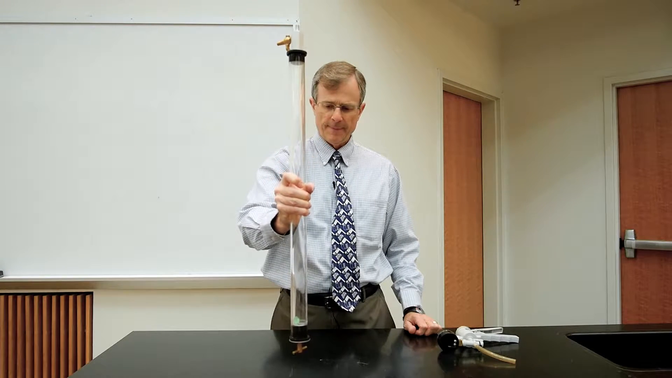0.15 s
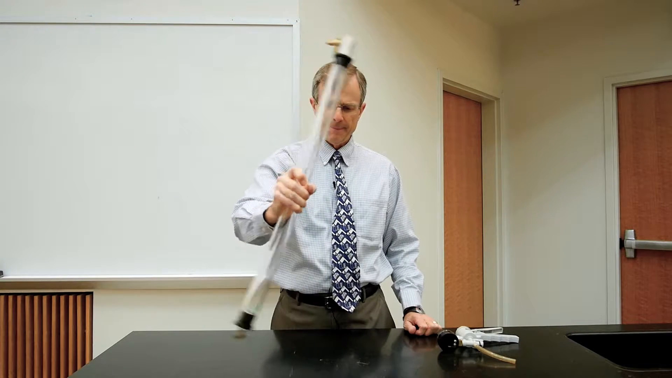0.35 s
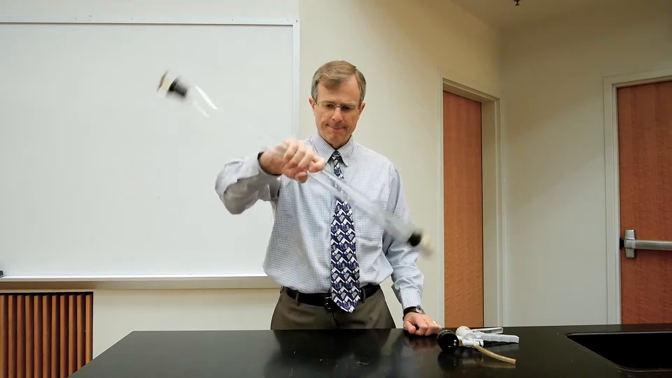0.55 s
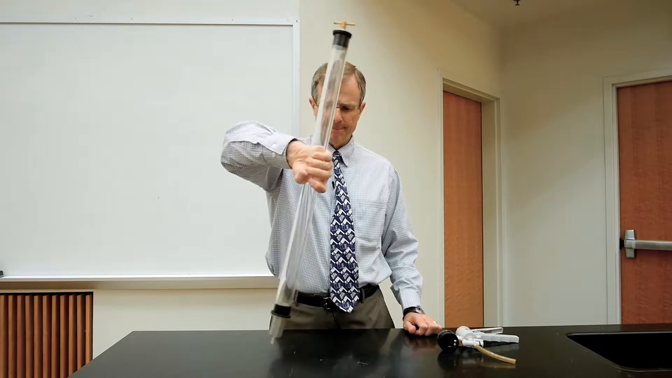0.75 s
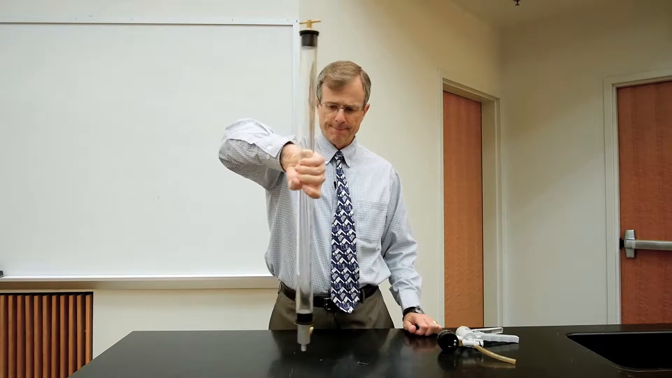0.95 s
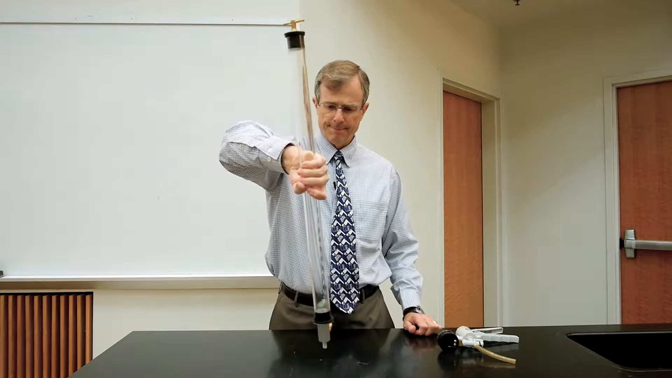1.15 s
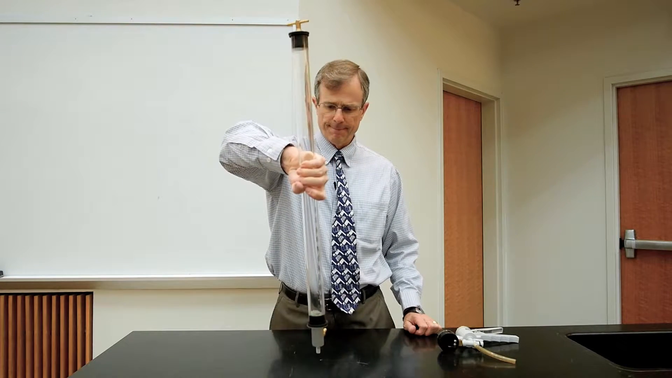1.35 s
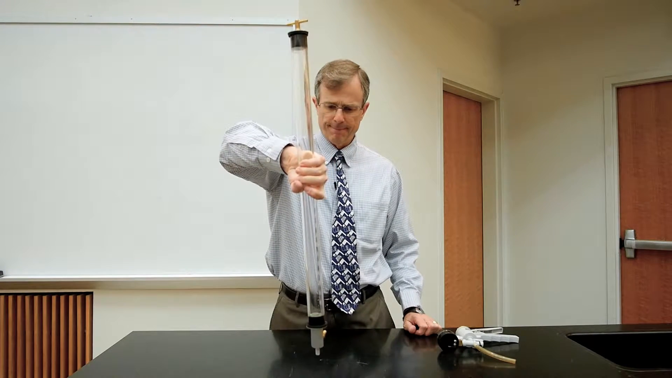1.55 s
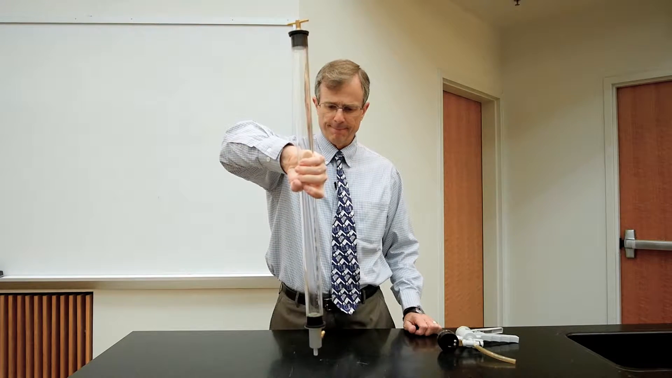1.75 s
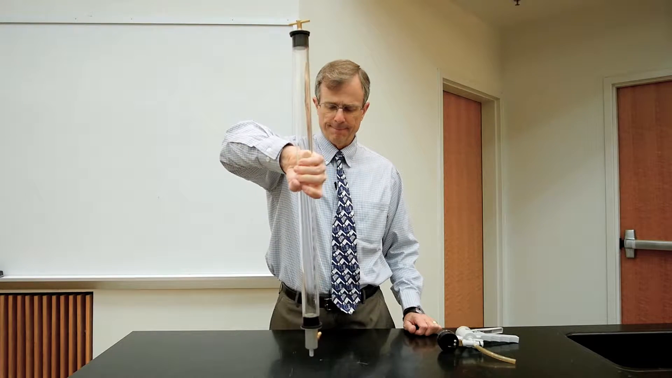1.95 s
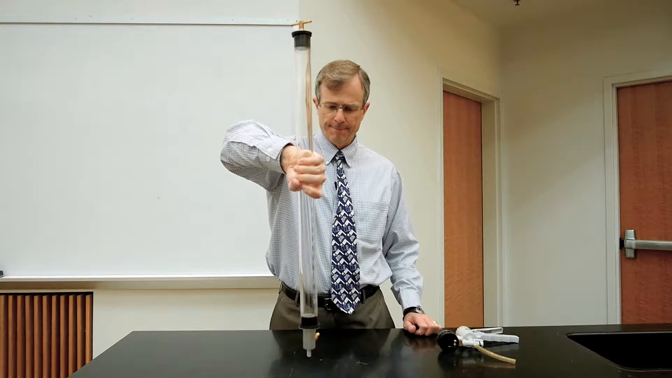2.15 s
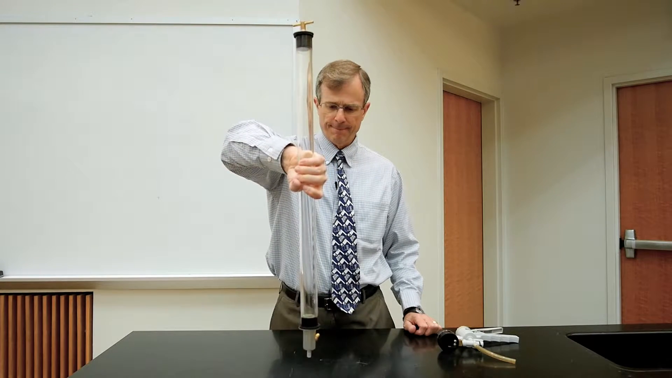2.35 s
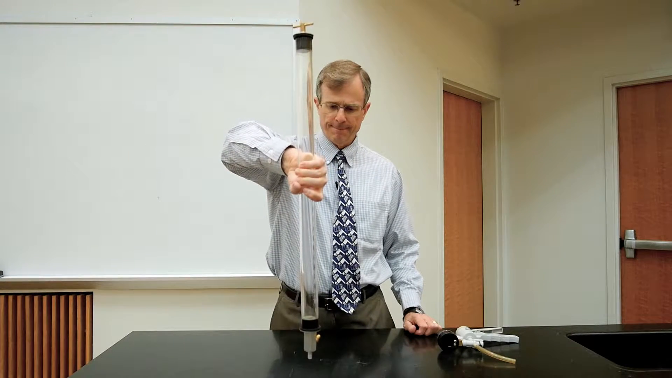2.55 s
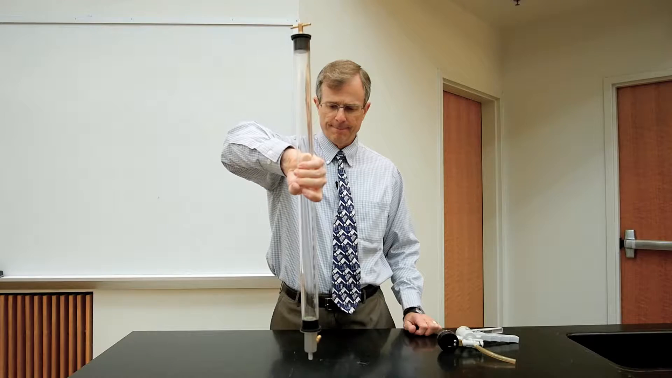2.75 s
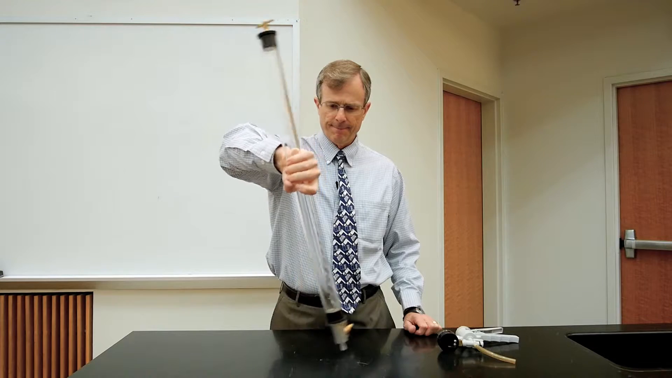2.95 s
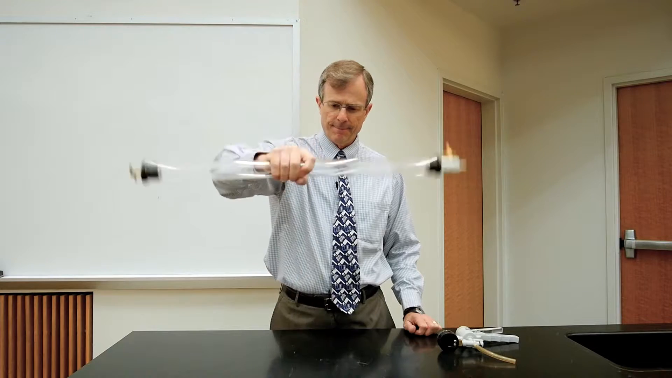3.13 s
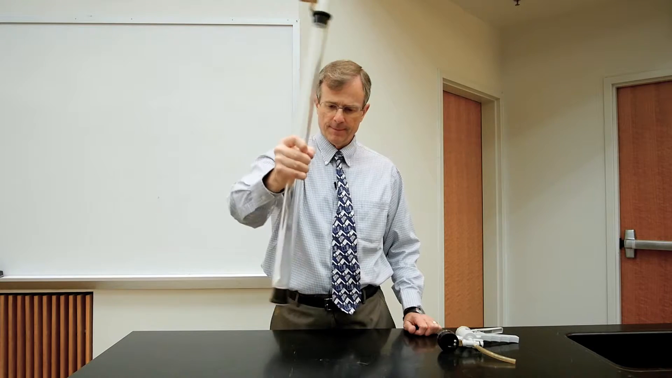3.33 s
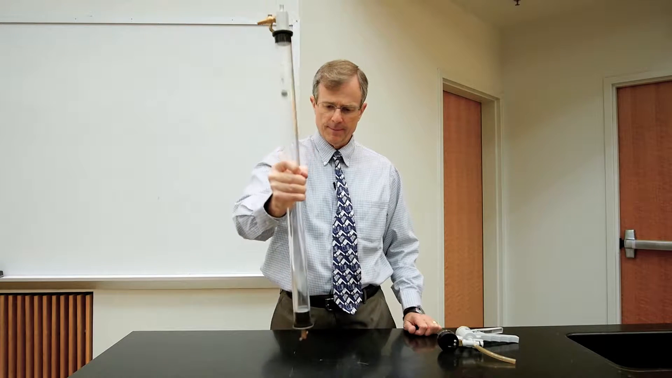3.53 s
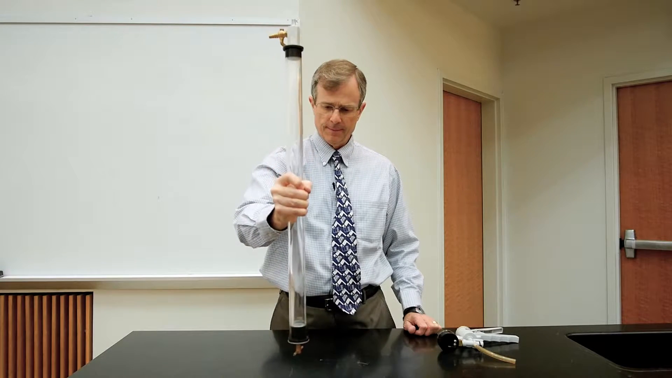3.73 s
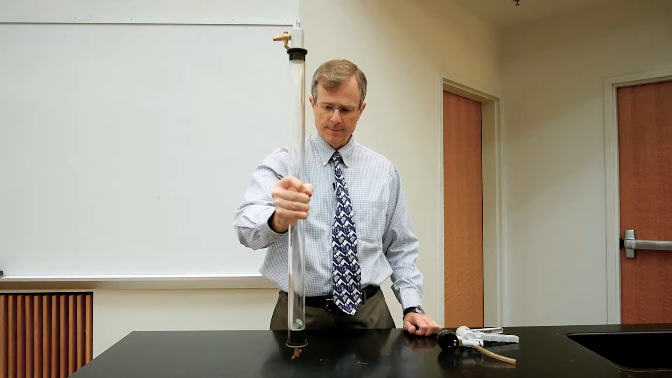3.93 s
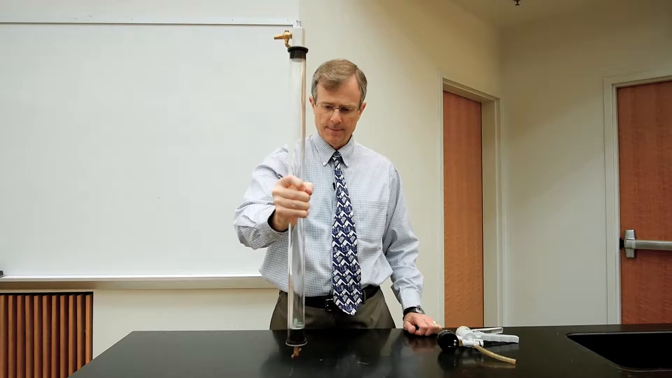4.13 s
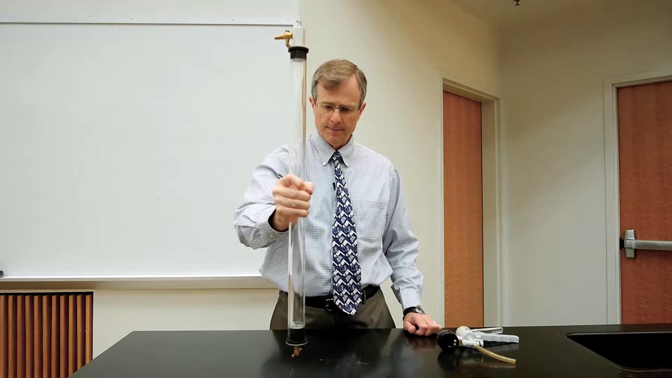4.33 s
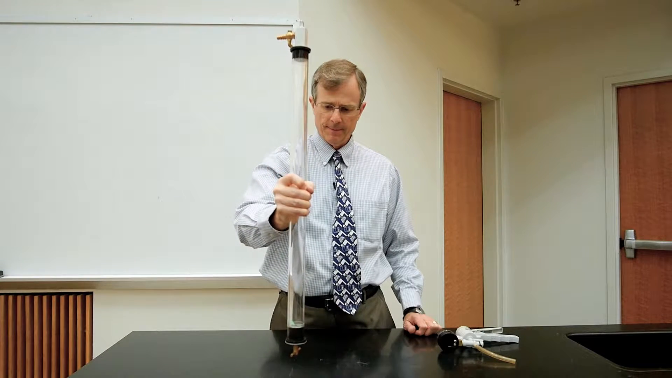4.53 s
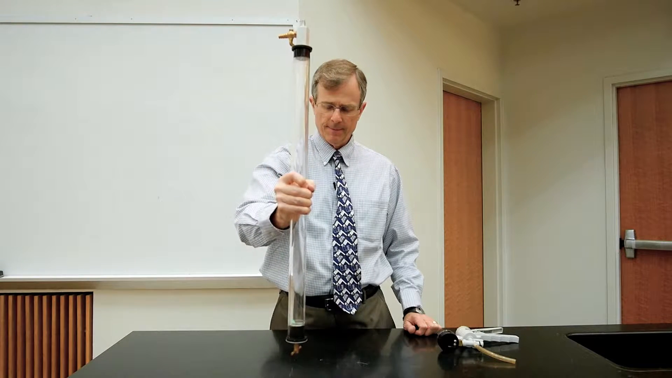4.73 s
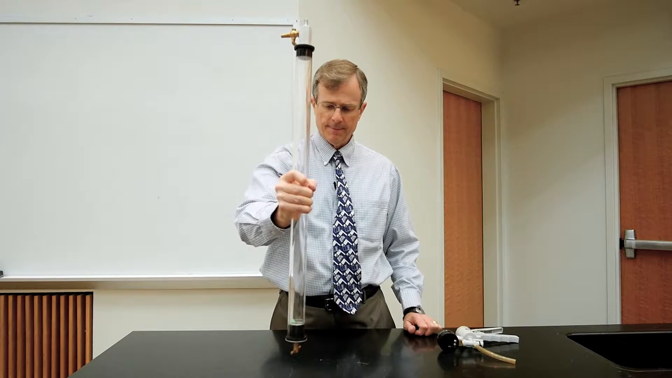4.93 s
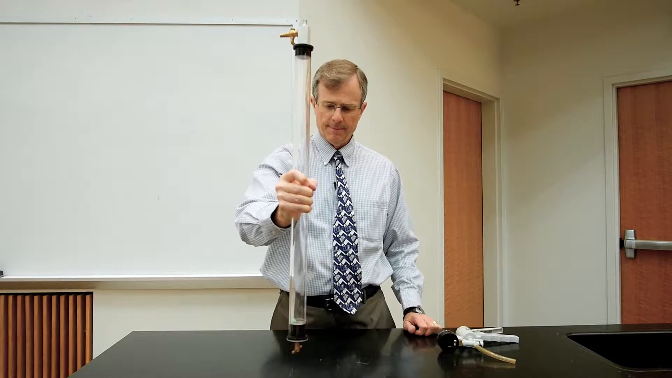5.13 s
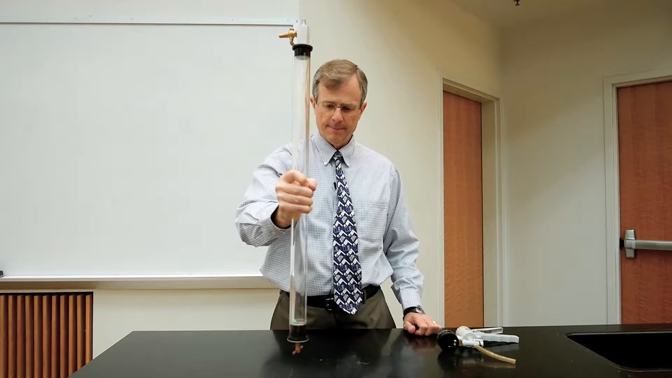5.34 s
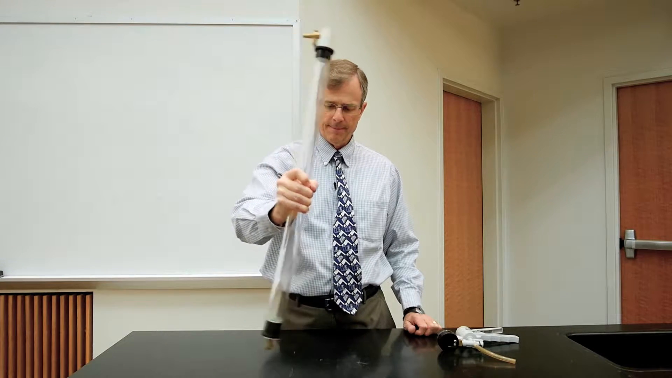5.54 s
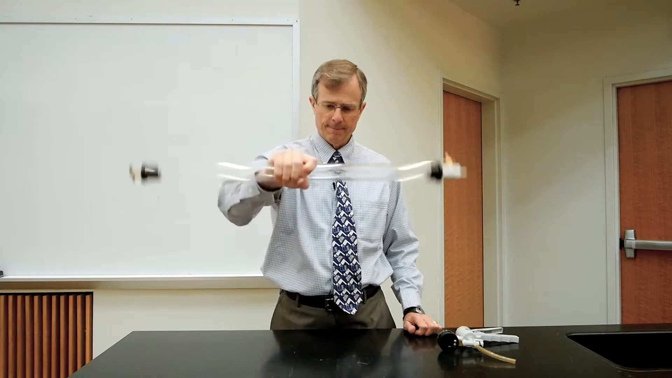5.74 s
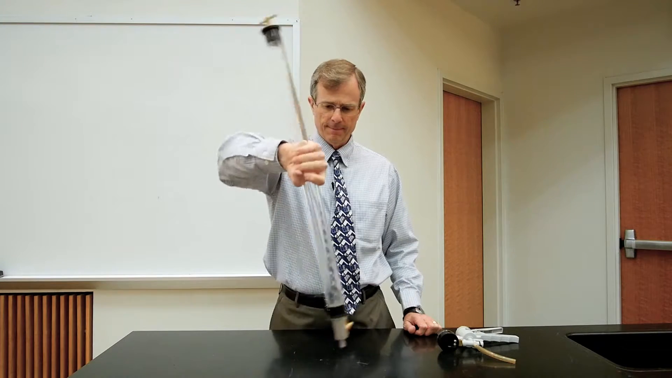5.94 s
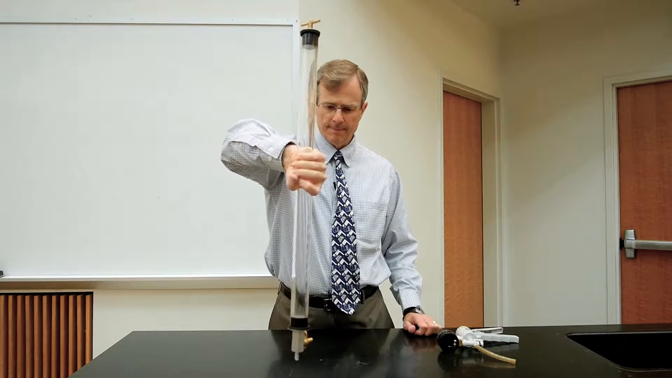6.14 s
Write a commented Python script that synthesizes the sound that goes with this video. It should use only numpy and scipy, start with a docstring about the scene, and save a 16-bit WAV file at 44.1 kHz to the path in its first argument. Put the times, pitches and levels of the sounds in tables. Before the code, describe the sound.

A quiet classroom has a low, slightly wavering ventilation rumble and faint hiss throughout. Near 0.3 s two tiny glassy clicks sound. A barely audible swish at 0.6 s accompanies the turning tube, and from 0.74 s a coin knocks quickly against glass and stopper, bright, dry and hard, with another cluster around 1.0 s. The strongest landing comes at 1.15 s with a short low thump, followed by gritty skidding and tiny ticks until 1.5 s. Quiet follows, broken by a light tap at 2.99 s. The next turn swishes softly near 3.3 s, with fine sliding ticks from 3.35 to 3.65 s. A sharp clack at 3.8 s leads into rapid bounces, a brief skid and delicate metallic settling until about 4.3 s. After more quiet, a third faint swish at 5.85 s precedes separate crisp taps from 5.99 to 6.28 s. Short reflections and a faint room tail follow the impacts.

```python
"""Coin in a turning glass tube

A coin skips and rattles down a long glass tube that is turned over by hand in a quiet classroom.
Each tap is a burst of tiny contacts that rings stopper, tube wall, glass and coin; heavy blows add a low push.
Skids are grainy noise. Bench and walls answer with smeared echoes and a faint tail.
Filtered noise makes the ventilation rumble, the microphone hiss and the faint swish of the swinging arm."""
import sys
import numpy as np
from scipy import signal
from scipy.fft import rfft, irfft, next_fast_len
from scipy.io import wavfile
from scipy.ndimage import uniform_filter1d

SR = 44100
rng = np.random.default_rng(int(sys.argv[2]) if len(sys.argv) > 2 else 0)


def pcm_store(signal):
    """Save signal as 16-bit PCM."""
    levels = np.round(np.clip(np.atleast_2d(signal), -1, 1) * 32767)
    wavfile.write(sys.argv[1], SR, levels.astype(np.int16).T)


N = 277036  # length in samples


def undb(db):
    """Turns a level in dB into a gain."""
    return 10 ** (np.asarray(db) / 20)


def unit(x):
    """Scales a sound so that its squared samples sum to 1."""
    return x / np.sqrt(np.sum(x ** 2))


def decay(t, t60):
    """Fading of a ring that loses 60 dB in t60 seconds."""
    return np.exp(-np.log(1000) * t / t60)


def band(x, hz, width_hz):
    """Keeps a broad band around hz, its edges held between hz / 4 and 0.45 of the sample rate."""
    low_hz = max(hz - width_hz / 2, hz / 4)
    high_hz = min(hz + width_hz / 2, .45 * SR)
    return signal.sosfilt(signal.butter(2, [low_hz, high_hz], "band", fs=SR, output="sos"), x)


def walk(rate):
    """Slow random wavering: levels held 1 / rate s, then smoothed twice; its spread is near 1."""
    hold = int(SR / rate)
    steps = np.repeat(rng.standard_normal(N // hold + 1), hold)
    smooth = uniform_filter1d(uniform_filter1d(steps, hold), hold)
    return 1.3 * smooth[:N]


def ring(modes, size, spread_db=0.):
    """A struck body rings as a sum of fading sines, with pitch and level a little different each time."""
    hz, db, t60 = np.transpose(modes)[:, :, None]
    t = np.arange(size) / SR
    chance = rng.standard_normal((len(modes), 2))
    gain = undb(db + spread_db * chance[:, :1]) * decay(t, t60)
    struck_hz = hz * (1 + .01 * chance[:, 1:])
    return np.sum(gain * np.sin(2 * np.pi * struck_hz * t), axis=0)


def add(track, sound, s):
    """Mixes a sound into the track at time s."""
    start = int(s * SR)
    track[start:start + len(sound)] += sound[:len(track) - start]


def air():
    """Ventilation and microphone hiss are noise shaped over frequency; the low part wavers a little."""
    # colour of the steady noise: f/Hz, relative level/dB per Hz
    colour_points = [(12, -59), (20, -31), (31, -16.5), (53, -9.5), (72, -2.5), (106, -3), (149, -1),
                     (353, -7.5), (728, -12), (910, -19), (1590, -27.5), (1830, -29.5), (2100, -30.5),
                     (3770, -39.5), (15600, -44)]
    level_db, hiss_top_hz, split_hz, waver_db = -43, 15850, 900, 1.44
    size = next_fast_len(N)
    hz = np.maximum(np.arange(size // 2 + 1) * SR / size, 1)
    points_hz, points_db = np.transpose(colour_points)
    colour = undb(np.interp(np.log(hz), np.log(points_hz), points_db))
    colour /= 1 + (hz / hiss_top_hz) ** 200  # steep end of the hiss
    noise = rfft(rng.standard_normal(size)) * colour
    low = 1 / (1 + (hz / split_hz) ** 2)
    rumble = irfft(noise * low, size)[:N]
    hiss = irfft(noise * (1 - low), size)[:N]
    return unit(rumble * undb(waver_db * walk(3.59)) + hiss) * np.sqrt(N) * undb(level_db)


def swing():
    """Arm and tube stir the air: a soft broad swish that swells while the tube is turned over."""
    # swings: time of fastest motion t/s, level/dB before the waver
    swings = [(.6, -60), (3.3, -62), (5.85, -62)]
    spread_s, tilt_hz, waver_db = 0.17, 2500, 1.3
    t = np.arange(N) / SR
    noise = band(rng.standard_normal(N), 2400, 16000)  # the edge limits make this 600 to 10400 Hz
    # a gentle fall above tilt_hz
    noise = signal.sosfilt(signal.butter(1, tilt_hz, fs=SR, output="sos"), noise)
    # each swell is bell-shaped
    swell = sum(undb(db) * np.exp(-.5 * ((t - s) / spread_s) ** 2) for s, db in swings)
    return unit(noise) * np.sqrt(N) * swell * undb(waver_db * walk(25))


def blows():
    """Lists each contact: time in s, chatter in ms, energy in dB of stopper, wall, glass, coin, coin edge."""
    # Energies here are given as rms over 1 ms.
    # taps of the coin: t/s, chatter/ms, then wall ring, glass, coin and coin edge energy/dB
    tap_rows = [(0.3252, 0.46, -28, -23.5, -35, -39), (0.3342, 0.37, -35.5, -38, -52, -63),
                (0.74, 1.3, -18, -16, -20.5, -28), (0.7581, 0.53, -62, -19, -18, -27),
                (0.7745, 0.19, -34, -22.5, -28, -43), (0.7974, 0.27, -43, -32, -34, -46),
                (0.8055, 0.42, -20, -24.5, -23, -21.5), (0.8102, 2.3, -24, -13.5, -13.5, -29),
                (0.8152, 0.9, -46, -25, -26, -38), (0.9816, 1.1, -25, -24, -16, -35),
                (1.0028, 0.75, -25.5, -25.5, -49, -49), (1.015, 2.6, -33, -39, -41, -62),
                (1.0212, 3.1, -32, -23, -40, -49), (1.0344, 1.7, -21.5, -17.5, -18, -26.5),
                (1.0486, 3.3, -33, -29, -36, -38), (1.1493, 1.08, -19.5, -20.5, -11.5, -16),
                (1.134, 3, -65, -52, -46, -48), (1.1583, 0.41, -55, -57, -39, -27),
                (1.166, 2, -56, -46, -40, -36), (1.1725, 0.7, -51, -55, -43, -34),
                (1.248, 1.7, -36.5, -49, -25.5, -26.5), (2.9889, 0.58, -37, -33.5, -25.5, -55),
                (3.487, 2.7, -60, -33, -54, -59), (3.4936, 1.4, -48, -31, -31.5, -45),
                (3.7923, 3.6, -34, -15, -14.5, -14.5), (3.7962, 0.81, -26, -20, -18.5, -35),
                (3.8099, 0.36, -48, -32, -26, -38), (3.8274, 1.7, -23.5, -21.5, -14, -27),
                (3.8446, 1.7, -47, -37, -44, -35), (3.8836, 0.4, -37, -34, -24, -34),
                (3.8895, 2.2, -34.5, -28, -27.5, -42), (5.9906, 1.8, -23, -26, -13.5, -31),
                (6.0433, 0.96, -19, -19, -30, -43), (6.0832, 1.4, -28, -28.5, -21.5, -45),
                (6.1061, 1.4, -14, -23, -18, -32), (6.1481, 3, -31, -44, -35.5, -56),
                (6.2808, 0.54, -28, -18, -23.5, -43)]
    # taps that hit the stopper: t/s
    on_stopper_s = (.7583, .9816, 1.1494, 1.1663, 1.2482, 2.9892, 3.7923, 3.8093, 3.8275, 3.8446, 3.8895)
    # dull ticks as something slides along the tube: t/s, chatter/ms, energy/dB before the part levels
    slide_ticks = [(0.8674, 2, -29.5), (0.8711, 3.2, -25), (0.8763, 3.8, -28), (0.9976, 1.5, -38),
                   (3.3553, 1.5, -46), (3.3868, 0.59, -40), (3.3924, 0.92, -44), (3.44, 1.1, -48),
                   (3.4476, 0.54, -36.5), (3.4538, 0.4, -37), (3.4614, 0.8, -44), (3.4763, 0.7, -34),
                   (3.4804, 1.7, -32.5), (3.4905, 2, -33), (3.498, 0.54, -29), (3.5005, 0.66, -35),
                   (3.5053, 0.9, -45), (3.5715, 2.8, -41.5), (3.5947, 2.0, -48), (3.6163, 0.35, -40),
                   (3.6434, 0.75, -42), (3.8481, 0.5, -36), (6.1557, 3.3, -37)]
    # bright ticks of the coin settling on the stopper: t/s, chatter/ms, energy/dB before the part levels
    settle_ticks = [(1.2513, 0.63, -36), (1.2718, 1, -32.5), (1.291, 0.94, -32), (1.3204, 0.21, -35),
                    (1.3236, 0.96, -40), (1.3276, 1.3, -42), (1.4005, 6.2, -38), (1.4527, 0.24, -30.5),
                    (1.4863, 0.32, -40.5), (3.9346, 0.72, -41), (3.979, 18.0, -41), (4.0484, 10, -38.5),
                    (4.0528, 1.5, -40), (4.0592, 5.6, -40), (4.109, 14, -42), (4.1196, 2.7, -30),
                    (4.1264, 0.8, -39), (4.159, 7.6, -47), (4.1686, 0.33, -38), (4.1729, 0.69, -46),
                    (4.1764, 0.36, -39.5), (4.2037, 0.33, -36), (4.2151, 0.24, -36), (4.2195, 0.33, -45),
                    (4.2344, 0.25, -36), (4.252, 0.39, -33.5), (4.2667, 0.25, -39), (4.2726, 0.24, -46)]
    # part levels added to each tick: stopper, wall ring, glass, coin, coin edge level/dB
    slide_colour = (-14, -1, -10, -15, -23)
    settle_colour = (-10, -13.5, -8.5, -0.2, -13)
    # the stopper against the loudest part of a tap, and the extra when the coin hits it
    stopper_share_db, on_stopper_db = -14, 7
    rows = []
    for s, chatter_ms, *parts_db in tap_rows:
        hits_stopper = min(abs(s - np.array(on_stopper_s))) < .003
        stopper_db = max(parts_db) + stopper_share_db + on_stopper_db * hits_stopper
        rows.append((s, chatter_ms, stopper_db, *parts_db))
    for ticks, colour_db in ((slide_ticks, slide_colour), (settle_ticks, settle_colour)):
        for s, chatter_ms, db in ticks:
            rows.append((s, chatter_ms, *(db + np.array(colour_db))))
    return rows


def taps():
    """A run of tiny contacts drives all parts; gives the direct sound and what the walls receive."""
    # clear modes of each part, before its band filter: f/Hz, relative level/dB, 60 dB fading time/s
    stopper = [(1080, 15.5, 0.0022), (1730, 4, 0.012), (2440, 6, 0.014)]
    wall = [(3250, 3.5, 0.018), (3395, 1.6, 0.0061)]
    glass = [(4760, -2.3, 0.0011), (5850, 2.2, 0.01), (6600, 1.9, 0.012)]
    coin = [(8070, -17.5, 0.026), (9000, 10, 0.004), (9950, -4, 0.011)]
    edge = [(12600, -6, 0.011), (15500, 4, .005)]
    # dense crowd of modes in each part: low f/Hz, high f/Hz, 60 dB fading time/s, level/dB against clear modes
    crowds = [(790, 2360, 0.002, 8), (2990, 4240, 0.0082, 0), (3550, 6650, 0.01, 10.5),
              (6930, 10840, 0.007, -1), (10400, 14500, 0.00817, 26)]
    first_contact_db = 6  # the first touch against the chatter after it
    strike_spread_db = 2.5  # how much the mode levels differ between strikes
    walls_ring_db = -12.0  # clear modes against the smooth band in what the walls receive
    direct, spread = np.zeros(N), np.zeros(N)
    ms = np.arange(2048) * 1000 / SR
    click = (ms == 0) * 1.
    for s, chatter_ms, *parts_db in blows():
        # the contacts hold for the chatter time and stop quickly
        hold = np.exp(-(ms / max(chatter_ms, .05)) ** 2)
        contacts = rng.standard_normal(len(ms)) * hold + undb(first_contact_db) * click
        parts = zip((stopper, wall, glass, coin, edge), crowds, parts_db)
        for modes, (low_hz, high_hz, t60, crowd_db), db in parts:
            part_band = signal.butter(3, [low_hz, high_hz], "band", fs=SR, output="sos")
            clear = signal.sosfilt(part_band, ring(modes, size=len(ms), spread_db=strike_spread_db))
            fading = rng.standard_normal(len(ms)) * decay(ms / 1000, t60)
            crowd = signal.sosfilt(part_band, contacts + fading)
            driven = signal.fftconvolve(contacts, clear)[:len(ms)]
            part = unit(driven) + undb(crowd_db) * unit(crowd)
            gain = undb(db) * np.sqrt(SR / 1000)  # rms over 1 ms
            add(direct, unit(part) * gain, s)
            # summed over all directions the crowd of modes evens out to a smooth band
            smooth = band(click, (low_hz + high_hz) / 2, 1.03 * (high_hz - low_hz))
            around = unit(smooth) + undb(walls_ring_db) * unit(clear)
            add(spread, unit(around) * gain, s)
    return direct, spread


def room():
    """Surfaces answer a sound with a few smeared echoes and a faint tail that fades band by band."""
    # echoes of nearby surfaces: delay t/ms, smear/ms, energy level/dB
    echoes = [(5.8, 0.53, -23), (8.2, 1.3, -22), (16, 7.5, -23.5), (20, 1.3, -33)]
    # tail: f/Hz, 60 dB fading time/s, energy level/dB before its band filter
    tail_bands = [(600, 0.864, -36), (2010, 1, -18), (5040, 0.95, -25), (9050, 0.59, -20),
                  (14000, 0.37, -36.5)]
    onset_ms = 5.9
    t = np.arange(SR) / SR
    out = np.zeros(SR)
    for delay_ms, smear_ms, db in echoes:
        late = np.maximum(t * 1000 - delay_ms, 0) / smear_ms
        out += undb(db) * unit(rng.standard_normal(SR) * late * np.exp(-2 * late))
    rise = 1 - np.exp(-t * 1000 / onset_ms)
    for hz, t60, db in tail_bands:
        tail = unit(rng.standard_normal(SR) * rise * decay(t, t60))
        out += undb(db) * band(tail, hz, hz)
    return out


def landings():
    """Heavy blows on a stopper push the whole tube: one short pressure push with a low ring."""
    # blows: t/s, push level/dB before the bass cut, push length/ms
    heavy_blows = [(0.741, -23, 1.4), (0.758, -22, 0.75), (0.9822, -22.5, 1.9), (1.0349, -20.5, 0.88),
                   (1.1503, -13, 2.35), (3.7933, -22, 2.1), (3.8288, -25.5, 1.6)]
    # low ring of tube and stopper: f/Hz, level/dB against the push, 60 dB fading time/s
    boom_modes = [(181, -17.5, 0.08), (723, -11, 0.025)]
    low_hz = 70.2  # the small stopper radiates little below this
    out = np.zeros(N)
    ms = np.arange(4096) * 1000 / SR
    for s, db, push_ms in heavy_blows:
        push = np.sin(np.pi * np.minimum(ms / push_ms, 1)) ** 2
        add(out, undb(db) * (push - ring(boom_modes, size=len(ms))), s)
    return signal.sosfilt(signal.butter(1, low_hz, "high", fs=SR, output="sos"), out)


def skids():
    """The coin spins and skids on the glass: dense, uneven grains of friction in glass and coin edge."""
    # skids: start t/s, hold after the rise/s, glass level/dB, coin edge level/dB
    skid_rows = [(1.112, 0.012, -54, -50), (1.16, 0.061, -62, -54), (1.212, 0.057, -56, -60),
                 (3.846, 0.02, -47, -62), (3.888, 0.08, -54, -66)]
    rise_s, fade_db_per_s = .025, 399.5
    grain_db, waver_db = 2, 1.6  # scatter of the grain sizes and their common wavering
    t = np.arange(N) / SR
    out = np.zeros(N)
    sizes_db = grain_db * rng.exponential(size=N) + waver_db * walk(200)
    grains = rng.standard_normal(N) * undb(sizes_db)
    glass = unit(band(grains, 7000, 8100)) * np.sqrt(N)
    edge = unit(band(grains, 13000, 9400)) * np.sqrt(N)
    for s, hold_s, glass_db, edge_db in skid_rows:
        rise = np.clip((t - s) / rise_s, 0, 1)
        fade = undb(-fade_db_per_s * np.maximum(t - s - rise_s - hold_s, 0))
        out += rise * fade * (glass * undb(glass_db) + edge * undb(edge_db))
    return out


def scene():
    """Adds up taps, pushes, their echoes, skids, swish and steady air."""
    direct, spread = taps()
    boom = landings()
    echoed = signal.fftconvolve(spread + boom, room())[:N]
    return (direct + boom + echoed + skids() + swing() + air())[None]


def record(dry):
    """Cuts the lowest bass gently and the top of the treble steeply."""
    bass_cut = signal.sosfilt(signal.butter(2, 30, "high", fs=SR, output="sos"), dry)
    top_hz = 16750
    return signal.sosfilt(signal.ellip(14, .3, 130, top_hz, fs=SR, output="sos"), bass_cut)


dry = scene()
out = record(dry)
pcm_store(out)
```